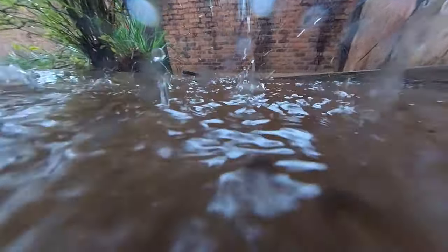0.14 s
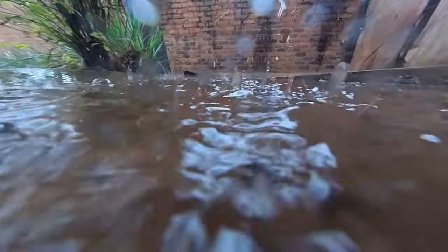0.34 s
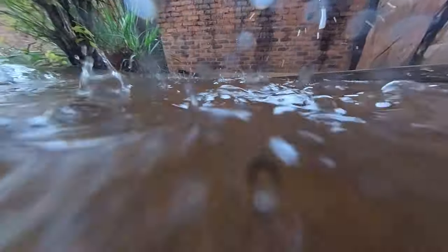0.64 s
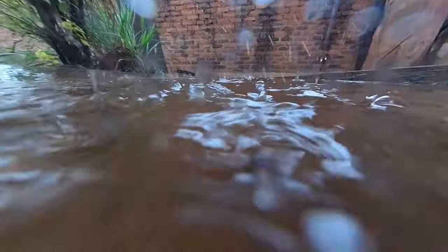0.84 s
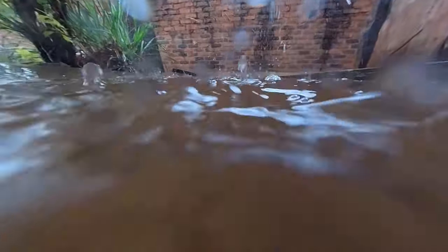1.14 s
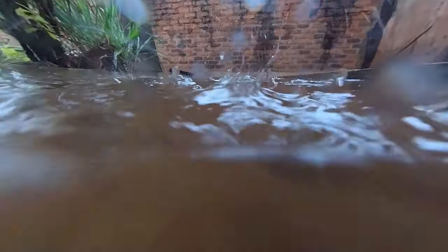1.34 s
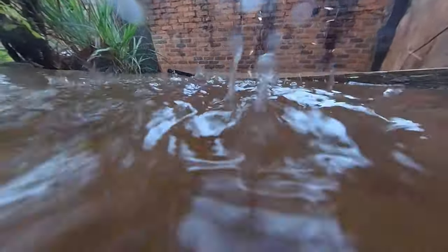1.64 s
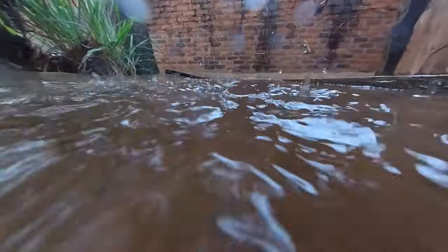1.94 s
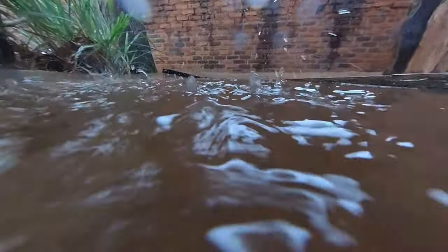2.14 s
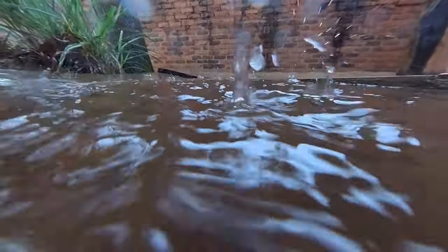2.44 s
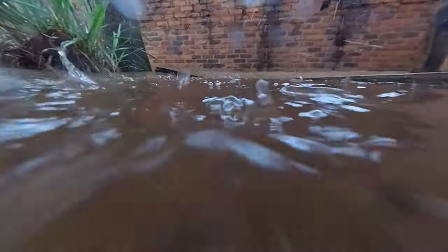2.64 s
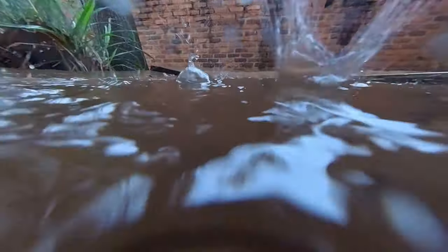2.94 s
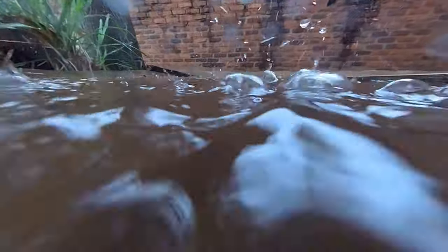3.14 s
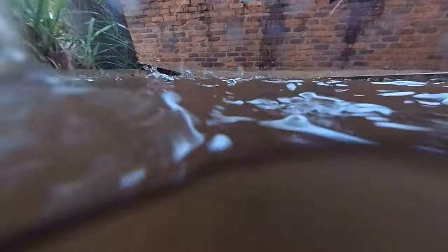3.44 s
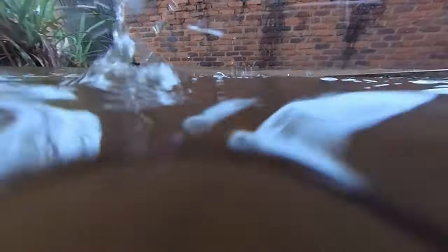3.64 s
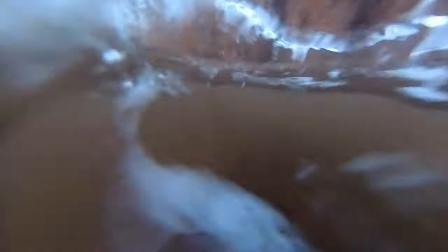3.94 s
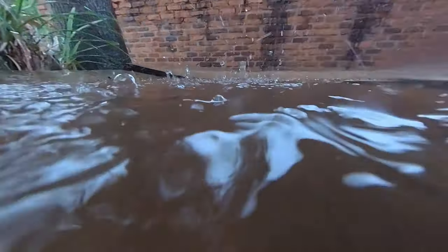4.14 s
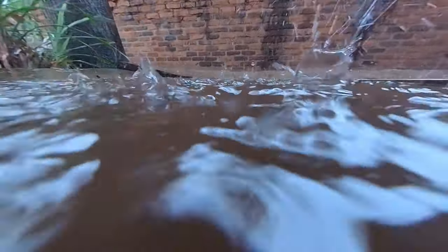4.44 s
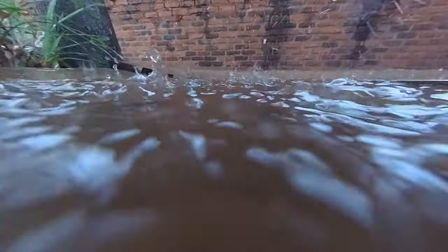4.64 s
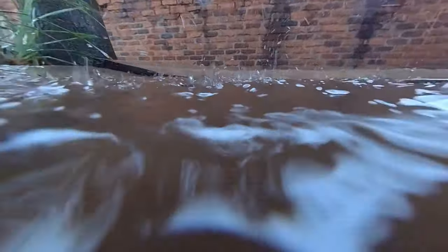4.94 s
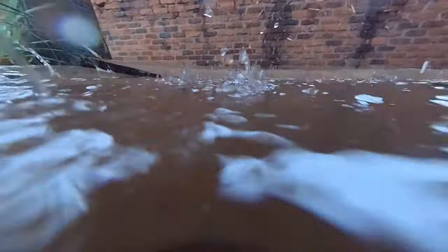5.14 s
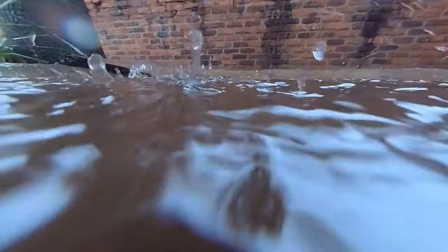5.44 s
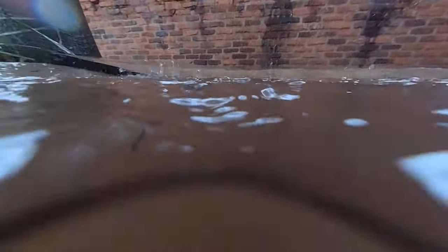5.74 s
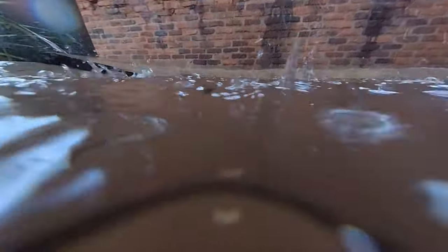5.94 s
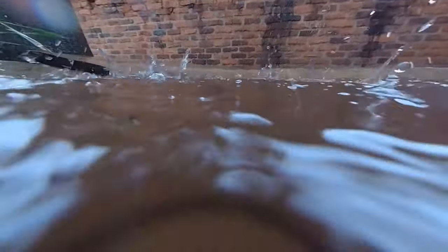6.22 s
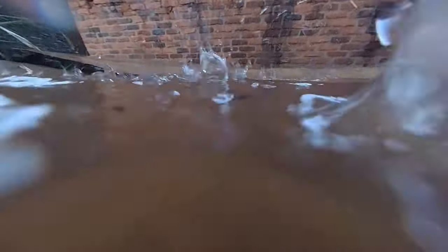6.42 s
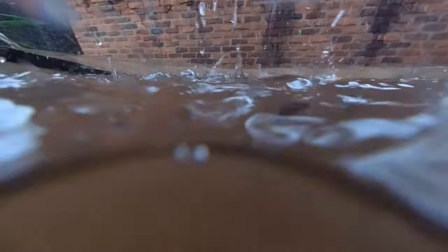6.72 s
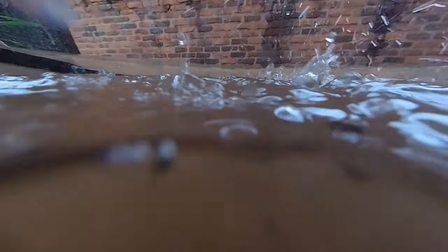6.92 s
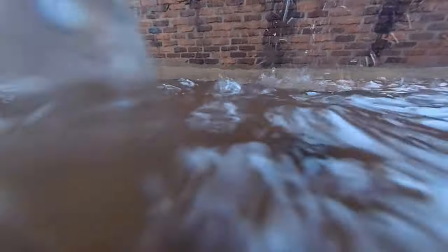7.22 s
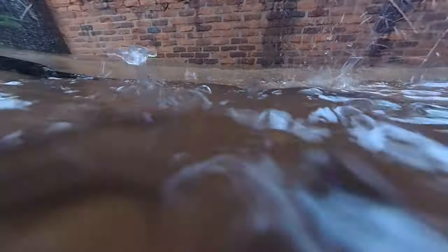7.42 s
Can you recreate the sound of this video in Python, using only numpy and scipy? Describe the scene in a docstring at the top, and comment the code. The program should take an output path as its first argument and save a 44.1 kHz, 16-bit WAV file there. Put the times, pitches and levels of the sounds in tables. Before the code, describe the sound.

Heavy rain on muddy runoff heard from a half-submerged microphone, muffled and gurgling, with hard drop thumps, clearing to an open hiss midway.

```python
"""Heavy rain falls on shallow runoff, heard by a small camera lying in the water. The rain is noise: a hiss,
ticks, thuds and gurgles. Water over the microphone port dulls it and adds resonances; for over two seconds the
port drains and the hiss opens up. Now and then the background level dips briefly and climbs back. Drops strike
the housing (blow, splash, thump and crack), wavelets slap the port (sinking low tones), short fading tones
ring, sharp clicks sound, water rumbles against the case, and the port squelches once (rough noise)."""
import sys
import numpy as np
from scipy import signal
from scipy.fft import rfft, irfft
from scipy.io import wavfile
from scipy.ndimage import uniform_filter1d, minimum_filter1d, map_coordinates

SR = 44100
rng = np.random.default_rng(int(sys.argv[2]) if len(sys.argv) > 2 else 0)


def to_wav(s):
    """Save 16-bit WAV."""
    ch = np.atleast_2d(s).T  # columns
    pcm = np.round(np.clip(ch, -1, 1) * 32767)  # PCM
    wavfile.write(sys.argv[1], SR, pcm.astype(np.int16))


def linear_from_db(decibels):
    """Turn decibels (scalar or array-like) into linear amplitude factors; 0 gives 1."""
    return 10 ** (np.asarray(decibels, float) / 20)


N = 334278

# Tone colour through the drained port: pitch_hz, relative level_db
DRAINED_COLOUR = [(15, -41.5), (25, -9), (106, -3), (288, -1.5), (368, -2.5), (447, -3), (645, -6.5),
                  (844, -8), (1080, -11), (1480, -14), (2090, -18.5), (3080, -27), (4670, -52.5),
                  (7260, -34.5), (8610, -47.5), (9700, -78.5), (11200, -85), (18900, -120)]
# Tone colour under water, before its resonances: pitch_hz, relative level_db
MUFFLED_COLOUR = [(20, -5.5), (60, -2.5), (200, -0.5), (500, -1), (1000, -5.5), (1400, -13), (2000, -25),
                  (3000, -43), (4200, -64.5), (8000, -86.5), (9000, -93)]
# Resonances of air trapped behind a thin film of water: pitch_hz, width_hz, lift_db
THIN_FILM_AIR = [(767.5, 150, 7.5), (1131, 264, 14.5)]
# Resonances and dips of air trapped behind deep water: pitch_hz, width_hz, lift_db
DEEP_WATER_AIR = [(714, 150, 9.5), (1015.5, 180, 11), (837, 57, -5), (2160, 4600, -14.5)]
# Waves that change the water over the port: middle_s, new cover (0 drained, 1 thin film, 2 deep)
# The first row is the cover at the start.
WASHES = [(0, 1.34), (0.779, 2), (.99, 1.02), (1.63, 1.86), (2.55, 1.01), (3.725, 2), (4.362, 0.3),
          (4.41, 0), (6.791, 2.5), (7.355, 1.2), (7.419, 2)]
# Level of the rain before the dips: time_s, level_db
RAIN_LEVEL = [(0, -15.5), (.4, -30), (1, -19.5), (1.55, -25), (1.85, -24), (2.5, -26.5), (3, -23.5),
              (3.73, -24.5), (4.3, -20), (4.4, -27), (5.6, -27), (6.75, -24.5), (6.85, -20.5), (7.58, -23)]
# Moments when the level dips: time_s, depth_db
LEVEL_DIPS = [(-.04, 15.5), (0.337, 1.5), (0.747, 14), (.85, 12.5), (.955, 15.5), (1.241, 12), (1.579, 12),
              (1.619, 12), (1.7, 9), (1.8, 4.5), (1.896, 21.5), (1.98, 20.5), (2.33, 5.5), (2.53, 6),
              (3.713, 14), (3.85, 7.5), (3.94, 9.5), (4.068, 19.5), (4.23, 19.5), (4.351, 25), (5.537, 7.5),
              (6.807, 20), (6.852, 15), (6.93, 11), (7.024, 14), (7.1, 12), (7.178, 14.5), (7.256, 21),
              (7.335, 21.5), (7.422, 23)]
# Drops on the housing: start_s, strength_db, thump_db (added to the strength), contact_ms, splash_ms
DROPS = [(.333, -17, -9, 0.48, 1.3), (.45, -21.5, 1.5, 0.66, 1.2), (.595, -21.5, 0.5, .44, 1.4),
         (.745, -20, -10, 0.27, 0.97), (.762, -14, -2, 0.49, 2.1), (0.802, -19, -11, 0.35, .55),
         (.849, -19, -12, .25, 6), (.898, -26, -15, .12, 2), (.933, -26, -19, 0.34, 2),
         (.955, -18, -25, 0.32, 1), (1.243, -16, 1, 0.92, 1.8), (1.579, -24, 9.5, 0.67, 1),
         (1.767, -24, -20, 0.055, .5), (1.787, -19, -14, 0.15, 7), (1.803, -15, -5, .8, 1),
         (1.83, -20, -8, .6, 1), (1.866, -21, -5, .6, 1), (1.897, -13, -6, 0.3, 0.26),
         (1.917, -26, -10, .64, 0.52), (1.958, -22, -3, 0.3, 1.5), (1.978, -34, -14, .1, 2),
         (2.29, -16.5, -24, .6, 10), (2.322, -18.5, -24, .22, 14), (2.371, -21, -25, .28, 21),
         (2.44, -19.5, -18, 0.524, 7.1), (2.488, -21, -26, .4, 8.2), (2.531, -20, -0.5, 0.29, 0.73),
         (3.712, -22, 4, 0.95, .3), (3.73, -19, 4, 1, .3), (3.745, -21.5, 3.5, 0.83, .41),
         (3.758, -16, -2.5, 0.65, 1.1), (3.817, -21.5, -18.5, 0.061, 2.7), (3.838, -16.5, -31, .17, 3.3),
         (3.887, -28, -19, .1, 1.2), (3.901, -17.5, -21, .4, 2), (3.926, -21, -22, .23, 2.6),
         (3.938, -16, -29, .27, 1.7), (4.048, -17.5, 0, 0.51, 1.4), (4.0654, -13.5, 5.5, 0.09, 0.093),
         (4.083, -27.5, -16, 0.098, 2), (4.232, -18, -5, 0.3, 10.5), (4.285, -28, -20, .15, 1.5),
         (4.331, -24, -4, .27, 1.9), (5.538, -15.5, -13, 0.033, .075), (5.73, -29, 13.5, 0.9, 0.28),
         (5.754, -22.5, 1, .55, 0.3), (5.821, -23.5, 6, 0.99, .33), (5.903, -21, 3.5, .97, .24),
         (6.798, -16, -26, 0.24, .96), (6.809, -9, -13.5, .19, 3.6), (6.834, -23, -5, .6, .5),
         (6.851, -21, -2.5, .95, 0.36), (6.905, -19, -21, 0.23, 4.6), (6.926, -23, -20, .3, 3),
         (6.966, -21, -15.5, 0.28, 3), (6.984, -19, -20, .41, 2), (7.023, -21.5, -6, .5, 0.54),
         (7.058, -16.5, -27, .3, 3.5), (7.093, -23, -12, .6, .4), (7.099, -14, -7, 0.9, 0.64),
         (7.253, -13, -15, 0.1, 2), (7.273, -20, -18, .27, 1.9), (7.335, -19, -23, .22, 2.5),
         (7.363, -23.5, 3, .17, 3), (7.382, -21.5, -4, .12, 1.7), (7.422, -16.5, -6, .15, 1.5),
         (7.429, -14.5, 0.5, 0.4, 3.5)]
# Colour of the crack through the housing: pitch_hz, relative level_db
CRACK_COLOUR = [(300, -29), (1300, -0.5), (2000, 0.5), (2800, -20), (4500, -47), (9000, -81.5)]
# Wavelets slapping the port: middle_s, level_db, pitch_hz (at the middle), length_ms
SLAPS = [(.376, -13.5, 100, 20), (.457, -17, 105, 13), (.601, -19, 110, 12), (0.728, -26, 100, 40),
         (1.6, -13.5, 68.5, 45), (1.983, -10, 76.3, 19), (2.431, -23, 50.7, 57), (2.571, -25, 109, 38),
         (3.691, -20, 89.4, 24), (4.088, -27.5, 68.2, 110), (4.301, -28, 50.3, 51), (4.315, -18, 75, 18),
         (4.338, -12.5, 80, 16), (4.355, -9.5, 107, 8.3), (4.376, -28.5, 118, 12.8),
         (5.667, -20.5, 88.5, 36), (5.756, -20, 150, 9), (5.805, -21, 110, 14), (5.836, -20, 85, 16),
         (5.89, -22, 120, 18), (5.985, -24, 100, 35), (7.37, -21, 65, 15), (7.441, -30, 88, 24)]
# Short fading tones, of bubbles and the higher thumps of some drops: start_s, level_db (before fading),
# pitch_hz (at the start), fade_ms (time to fall 60 dB), slide (pitch change over that time, as a share)
FADING_TONES = [(.333, -12.5, 250, 38, -.2), (.7165, -25.5, 2660, 21, -0.03), (.7443, -4, 940, 18, -.1),
                (.761, -9, 1000, 22, -.1), (1.2418, -5, 760, 16, 0), (.944, -42, 2120, 35, -0.1),
                (2.321, -13.5, 877, 53, 0.3), (2.42, -39.5, 2500, 29, -0.2), (3.662, -23.5, 2010, 35, 0.08),
                (3.664, -33, 2700, 14, -0.3), (3.696, -41.5, 2700, 28, -0.1), (4.0645, -6, 1100, 10, 0),
                (4.0645, -9, 1700, 7, 0), (3.712, -14, 190, 30, 0), (3.7285, -8, 240, 30, 0),
                (4.232, -18, 280, 140, 0), (4.317, -47, 2020, 150, -1.2), (5.95, -23.5, 6370, 16, 0.7),
                (6.249, -10, 1900, 10, 0.4), (6.369, -19, 2200, 30, -.03), (7.253, -6, 620, 26, .2),
                (7.2525, -9, 940, 22, -.1), (7.272, -9.5, 918, 28, 0), (7.335, -18, 900, 28, 0),
                (7.316, -49, 2450, 28, -0.21), (7.363, -25, 2040, 31, -0.2), (7.363, -41, 3000, 12, 0),
                (7.382, -43, 2950, 10, 0), (7.365, -22.5, 1390, 24, 0.1), (7.382, -32, 2040, 95, -.03),
                (7.4213, -5, 720, 28, -.2), (7.428, -11, 900, 20, -0.3)]
# Air under deep water ringing on: start_s, upper_db, lower_db (notes before fading), fade_ms (to fall 60 dB)
AIR_RINGS = [(2.208, -22.5, -33.5, 72), (2.332, -18, -29.5, 80), (2.372, -20, -34, 126),
             (2.455, -19, -30, 150), (2.488, -33, -19.5, 200), (4.232, -23.5, -17, 130),
             (6.81, -33, -8.5, 77)]
# Single sharp clicks, from faint to bright: time_s, strength_db
LISTED_TICKS = [(.302, -65), (.352, -65), (.412, -68), (.732, -61), (1.222, -55.5), (1.562, -39.5),
                (1.767, -52), (1.963, -52), (2.022, -59), (2.833, -65), (3.601, -62), (3.802, -62),
                (4.052, -52), (4.312, -47.5), (4.936, -25.5), (5.518, -32.5), (5.538, -14.5), (5.716, -37),
                (5.913, -24.5), (5.952, -23.5), (6.246, -27.5), (6.301, -31.5), (6.776, -28.5),
                (6.793, -40.5), (7.083, -54), (7.143, -62), (7.412, -55), (7.472, -60)]
# Colour of the clicks: pitch_hz, relative level_db
TICK_COLOUR = [(800, -38), (2000, 3), (4500, 4), (7200, 7), (8300, -3.5), (9500, -38), (13000, -66)]
# Dips in the sound of the drained port: pitch_hz, width_hz, lift_db (negative is a cut)
PORT_NOTCH = [(4860, 3500, -25), (2500, 2500, -20)]
# Colour of the squelch: pitch_hz, relative level_db
SQUELCH_COLOUR = [(200, -10), (600, -3.5), (1400, 2), (2400, -11), (3200, -25.5), (3800, -49), (6000, -90)]
# Resonances of the narrow gap during the squelch: pitch_hz, width_hz, lift_db
SQUELCH_AIR = [(1380, 200, 5), (2040, 220, 12.5), (3000, 400, 1.5)]
# What the converter lets through of the mirrored low tones: pitch_hz, relative level_db
MIRROR_COLOUR = [(13500, -70), (14200, -14), (14900, 0), (15400, -14), (15750, -12), (15950, -70)]


def unit(x):
    """Scale a sound to an rms of 1."""
    return x / np.sqrt(np.mean(x ** 2) + 1e-20)


def along(points, hz):
    """Read a colour table at the given pitches, on a log pitch axis."""
    f, v = np.transpose(points)
    return np.interp(np.log(hz + 1), np.log(f + 1), v)


def wobble(rate):
    """A smooth random curve with `rate` random points a second."""
    knots = rng.standard_normal(int(N * rate / SR) + 4)
    return map_coordinates(knots, [np.arange(N) * rate / SR])


def coloured(x, spectrum, modes=()):
    """Filter x without pre-echo, keeping the rms that white noise would have."""
    size = 8192
    hz = np.fft.rfftfreq(size, 1 / SR)
    resonances = sum(lift / (1 + (2 * (hz - centre) / width) ** 2) for centre, width, lift in modes)
    db = along(spectrum, hz) + resonances
    # folding the cepstrum forward puts all of the response after time zero
    cepstrum = irfft(np.log(linear_from_db(db) + 1e-7))
    cepstrum[1:size // 2] *= 2
    cepstrum[size // 2 + 1:] = 0
    response = irfft(np.exp(rfft(cepstrum)))
    return signal.fftconvolve(x, response / np.linalg.norm(response))[:N]


def add(track, s, sound):
    """Mix a sound into the track at s seconds."""
    part = track[round(s * SR):][:len(sound)]
    part += sound[:len(part)]


def patter(rate, spread_db, life):
    """Noise grains at random times, `rate` a second, fading over `life` seconds; a few are much larger."""
    when, size = rng.random((int(rate * N / SR), 2)).T
    spikes = np.bincount((when * N).astype(int), linear_from_db(-spread_db * np.log(size + 1 / 50)), N)
    t = np.arange(SR // 40) / SR
    envelope = signal.fftconvolve(spikes, np.exp(-t / life))[:N]
    return unit(envelope * rng.standard_normal(N))


def cover_at(s):
    """How much water lies over the port at s seconds: each wave ramps it to a new depth."""
    wash_s = 0.026  # time a wave takes
    when, cover = np.transpose(WASHES)
    steps = np.clip((np.asarray(s)[..., None] - when[1:]) / wash_s + .5, 0, 1)
    return np.clip(cover[0] + steps @ np.diff(cover), 0, 2)


def lapping():
    """Water moving against the case: low noise that rumbles in lumps."""
    lumps = linear_from_db(2.1 * wobble(6.7)) * rng.standard_normal(N)
    colour = [(15, -25.5), (40, -8.5), (80, 9.5), (200, -15.5), (400, -31.5), (800, -71.0)]
    return unit(coloured(lumps, colour))


def squelch():
    """Water sucked through the narrow gap of the port: short rough noise in the gap's resonances."""
    start_s, end_s, level_db, fade_db_per_s = 7.362, 7.417, -38.5, 90
    t = np.arange(N) / SR
    gate = np.clip(np.minimum(t - start_s, end_s - t) / .003, 0, 1)
    gate = gate * linear_from_db(level_db - fade_db_per_s * np.clip(t - start_s, 0, 1))
    return coloured(gate * patter(1500, 1.2, life=.002), SQUELCH_COLOUR, SQUELCH_AIR)


def slaps():
    """Each wavelet pushes the membrane in and out a few times, ever slower, and gurgles."""
    sink, tail = .5, 1.48  # rough share the pitch falls over the length; how much slower it dies than it rises
    out, t = np.zeros(N), np.arange(-.1, .1, 1 / SR)
    waver = .7 * wobble(70)
    colour = [(40, -31.5), (150, -0.5), (300, -5.5), (600, -32.5), (1500, -69)]
    gurgle = unit(coloured(rng.standard_normal(N), colour))
    for s, db, hz, ms in SLAPS:
        at = round((s + t[0]) * SR) + np.arange(len(t))
        phase = 2 * np.pi * hz * t * (1 - sink * np.tanh(500 * t / ms)) + waver[at]
        push = np.cos(phase) + 0.16 * gurgle[at]
        envelope = np.exp(-(3000 * t / ms / np.where(t > 0, tail, 1)) ** 2 / 2)
        add(out, s + t[0], linear_from_db(db) * push * envelope)
    return out


def fading_tones():
    """Bubbles, trapped air and the higher thumps of some drops: fading, rough tones whose pitch may slide."""
    air_slide = -0.025  # pitch change of the trapped air over its fade, as a share
    out, t = np.zeros(N), np.arange(SR // 8) / SR
    waver = .6 * wobble(350)
    air = []
    for s, upper_db, lower_db, ms in AIR_RINGS:
        for db, mode in zip((lower_db, upper_db), DEEP_WATER_AIR):
            air.append((s, db, mode[0], ms, air_slide))
    for s, db, hz, ms, slide in FADING_TONES + air:
        age = 1000 * t / ms
        phase = 2 * np.pi * hz * t * (1 + slide * age / 2)
        phase = phase + hz / 2000 * waver[round(s * SR):][:len(t)]  # higher notes waver more
        onset = 1 - np.exp(-(t / 0.0012) ** 2)
        add(out, s, linear_from_db(db - 60 * age) * onset * np.sin(phase))
    return out * linear_from_db(2.7 * wobble(300))  # roughness


def cracks():
    """Short, hard contacts of drops crack through the housing, past the water."""
    hard_ms = 0.12  # contacts longer than this crack much less
    out = np.zeros(N)
    for s, db, _, contact_ms, _ in DROPS:
        out[round(s * SR)] = linear_from_db(db - 1.5) / (1 + (contact_ms / hard_ms) ** 3)
    return coloured(out, CRACK_COLOUR)


def drops():
    """Each drop gives a rounded blow, a splash that rings the trapped air, and a low thump of the housing."""
    thump_hz, scatter = 120, 0.11  # the housing's low note; its spread from drop to drop, as a share
    gulp, gulp_s = 0.83, 0.0032  # a thump starts higher by this share and sinks with this time constant
    splash, thump, t = np.zeros(N), np.zeros(N), np.arange(SR // 10) / SR
    for s, db, thump_db, contact_ms, splash_ms in DROPS:
        hz = thump_hz * np.exp(scatter * rng.standard_normal())
        contact, life = np.maximum([contact_ms, splash_ms], 1 / 50) / 1000
        touch = np.exp(-2.2 * t / contact)
        touch /= touch.sum() ** 0.87  # a longer contact is softer
        deep = np.clip(cover_at(s) - 1, 0, 1)
        ring = 0
        for thin, low in zip(THIN_FILM_AIR, DEEP_WATER_AIR):
            air_hz = thin[0] + deep * (low[0] - thin[0])
            ring = ring + linear_from_db(rng.normal(0, 3.0)) * np.sin(2 * np.pi * air_hz * t)
        spray = ring + 5.6 * rng.standard_normal(len(t))
        spray = spray * np.exp(-t / life) * (1 - np.exp(-3 * t / life))
        spray /= np.linalg.norm(uniform_filter1d(spray, size=20))  # even out the strength below about 1 kHz
        blow = touch / (1 + splash_ms / 1.845) + 0.077 * splash_ms ** 0.37 * spray
        add(splash, s, linear_from_db(db + 20.5) * blow)
        sinking_time = t + gulp * gulp_s * (1 - np.exp(-t / gulp_s))
        envelope = np.exp(-2.3 * hz * t) * (1 - np.exp(-(t / 0.00066) ** 2))
        add(thump, s, linear_from_db(db + thump_db + 5.0) * np.sin(2 * np.pi * hz * sinking_time) * envelope)
    return splash, thump


def ticks(level):
    """Single sharp clicks: random ones follow the rain level, the others come at listed times."""
    per_s, random_db, spread_db = 22, -6, 3.5  # rate of random clicks, base strength against the rain, spread
    under_water_db = -41  # loss of a random click under water
    out = np.zeros(N)
    drained = cover_at(np.arange(N) / SR) < .5
    when, size = rng.random((300, 2)).T
    at = (np.cumsum(-np.log(when + 1e-9)) / per_s * SR).astype(int)
    size, at = size[at < N], at[at < N]
    strength_db = random_db - spread_db * np.log(size + 1 / 20) + under_water_db * ~drained[at]
    out[at] = level[at] * linear_from_db(strength_db)
    for s, db in LISTED_TICKS:
        out[round(s * SR)] = linear_from_db(db + 8.0)
    return coloured(out * ~drained, TICK_COLOUR) + coloured(out * drained, TICK_COLOUR, PORT_NOTCH)


def through_port(x):
    """Water over the port dulls the sound; deeper water lowers the resonances of the trapped air."""
    cover = cover_at(np.arange(N) / SR)
    ripple = .1 * abs(wobble(8)) * (cover > 1)  # ripples deepen the cover a little
    cover = np.minimum(cover + ripple, 2)
    cover = cover * (cover > 1 / 5)  # a mere wetting muffles nothing
    # blend the drained, thin and deep sounds by the depth
    shares = np.sqrt(np.clip(1 - abs(cover - np.arange(3)[:, None]), 0, 1))
    shares /= np.maximum(1, shares.sum(0) ** .5)
    drained = shares[0] * coloured(x, DRAINED_COLOUR)
    thin = shares[1] * coloured(x, MUFFLED_COLOUR, THIN_FILM_AIR)
    deep = shares[2] * coloured(x, MUFFLED_COLOUR, DEEP_WATER_AIR)
    return drained + thin + deep


def swell():
    """Background level in dB: at each listed dip the level drops, holds, then climbs back at a steady rate."""
    lead_s, hold_s, climb_db_per_s = 0.01, 0.041, 62  # drops this early, holds this long after the listed time
    t = np.arange(0, N, 44) / SR  # about one point a millisecond
    s, depth = np.transpose(LEVEL_DIPS)[:, :, None]
    climbed = climb_db_per_s * np.maximum(0, t - s - hold_s)
    dip = np.where(t > s - lead_s, depth - climbed, 0).max(0)
    dip = uniform_filter1d(np.maximum(dip, 0), 8)  # soften the corners over 8 points
    every = np.arange(N) / SR
    return np.interp(every, *np.transpose(RAIN_LEVEL)) - np.interp(every, t, dip)


def rain():
    """Far rain hisses, near drops tick, big ones thud; deeper water over the port adds more gurgling runoff."""
    heavy_per_s, heavy_db, heavy_ms = 60, -25, .5  # big drops: rate, mix level, half-width of the push
    far = linear_from_db(0.26 * wobble(7.2) + 0.54 * wobble(2.83) + 0.69 * wobble(25)) * rng.standard_normal(N)
    near = patter(400, 2.0, life=0.00027)
    gurgle = patter(45, 2.76, life=0.0045) * linear_from_db(-14.5 + 5.6 * cover_at(np.arange(N) / SR))
    when, size = rng.random((int(heavy_per_s * N / SR), 2)).T
    hits = np.bincount((when * N).astype(int), -np.log(size + 1 / 50), N)
    push = np.exp(-(np.arange(-200, 200) / SR * 1000 / heavy_ms) ** 2)
    heavy = unit(signal.fftconvolve(hits, np.gradient(push))[:N])
    mix = far + linear_from_db(-9.0) * near + linear_from_db(heavy_db) * heavy + gurgle
    # strong gurgling turns the whole rain down, averaged over half a second
    return mix / np.sqrt(1 + uniform_filter1d(gurgle ** 2, size=SR // 2))


def scene():
    """Rain, splashes and rumble pass through the port or join at the rain's level; the rest is added directly."""
    level = linear_from_db(swell())
    splash, thump = drops()
    bed = through_port(level * rain() + splash) + level * linear_from_db(-16.5) * lapping()
    return (bed + thump + slaps() + fading_tones() + squelch() + cracks() + ticks(level))[None]


def roll_off(x):
    """The treble ends steeply here."""
    return signal.sosfilt(signal.butter(12, 15830, fs=SR, output="sos"), x)


def record(dry):
    """The microphone's low cut, a look-ahead peak limiter and a faint mirror of the low tones below 16 kHz."""
    sampling_hz, mirror_db = 16000, -68  # the camera's slow sampling rate; mix level of the mirror
    dry = signal.sosfilt(signal.butter(1, 14, "high", fs=SR, output="sos"), dry)
    need = np.minimum(1, .76 / (abs(dry) + 1e-9))
    gain = uniform_filter1d(minimum_filter1d(need, size=265), size=132)
    held = dry * gain
    carrier = np.cos(2 * np.pi * sampling_hz * np.arange(N) / SR)
    mirror = coloured(held[0] * carrier, MIRROR_COLOUR)
    return roll_off(held + linear_from_db(mirror_db) * mirror)


dry = scene()
out = record(dry)
to_wav(out)
```